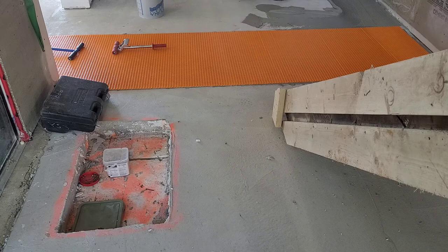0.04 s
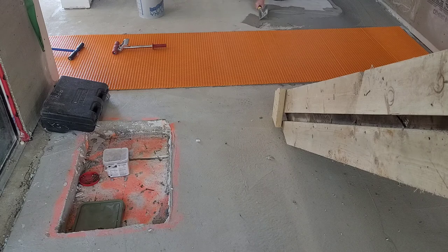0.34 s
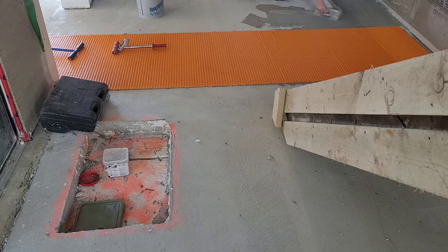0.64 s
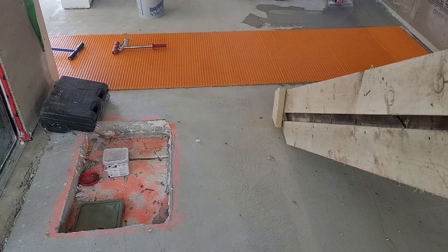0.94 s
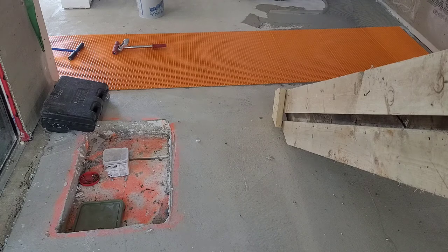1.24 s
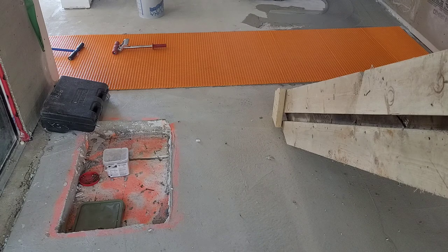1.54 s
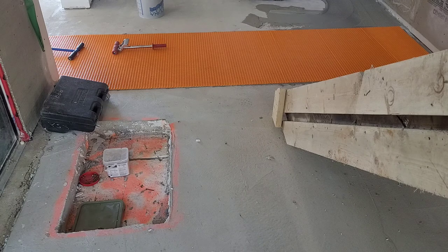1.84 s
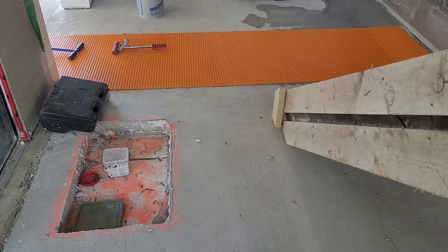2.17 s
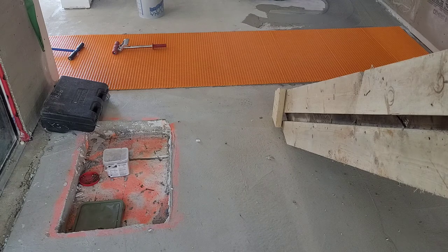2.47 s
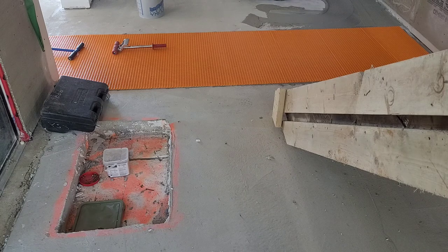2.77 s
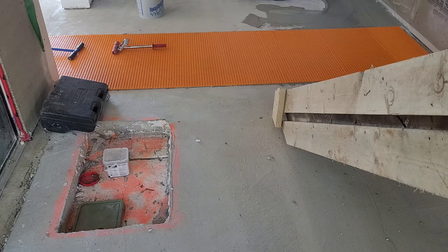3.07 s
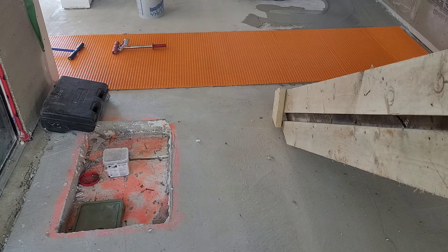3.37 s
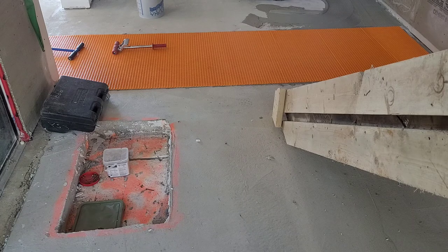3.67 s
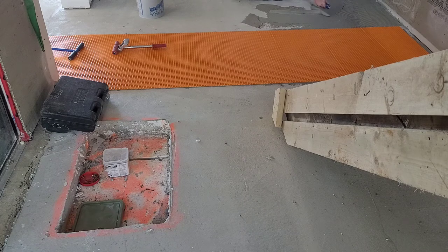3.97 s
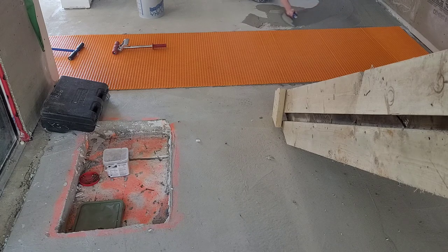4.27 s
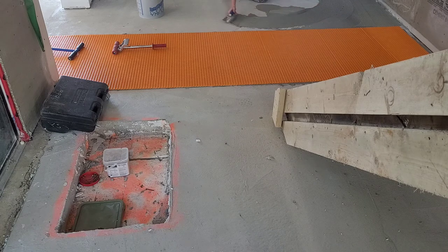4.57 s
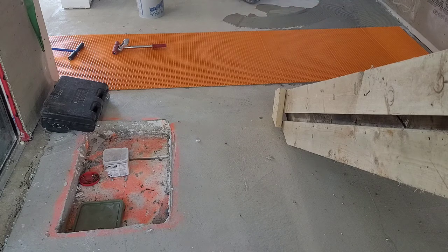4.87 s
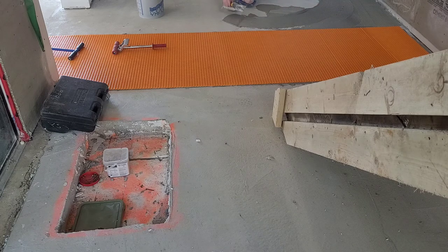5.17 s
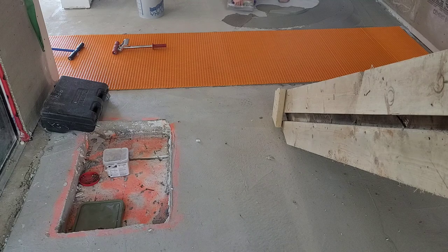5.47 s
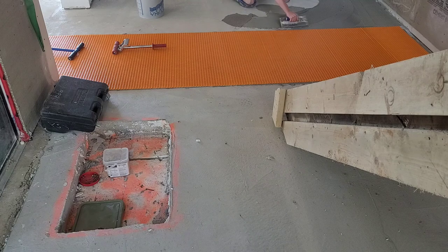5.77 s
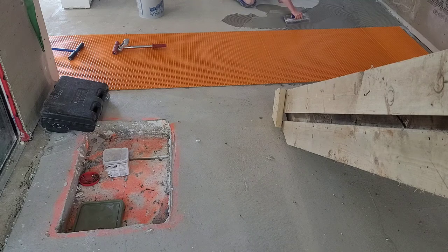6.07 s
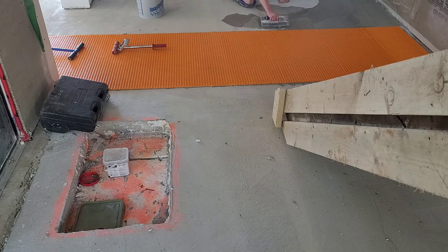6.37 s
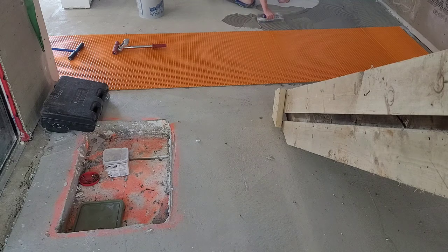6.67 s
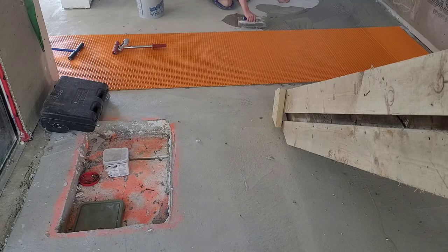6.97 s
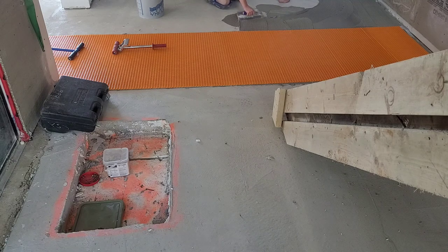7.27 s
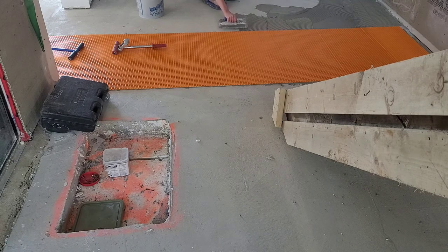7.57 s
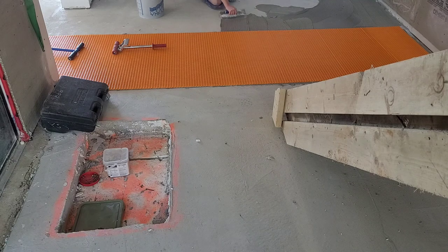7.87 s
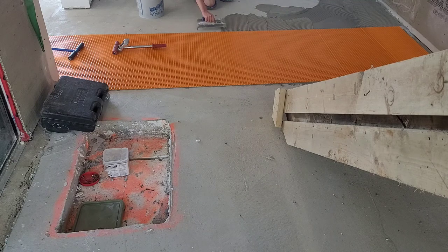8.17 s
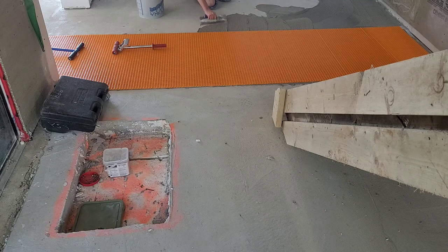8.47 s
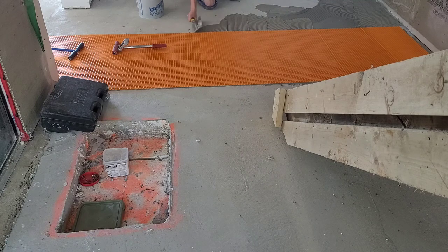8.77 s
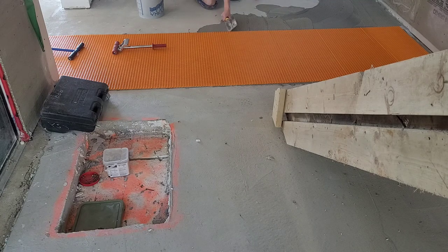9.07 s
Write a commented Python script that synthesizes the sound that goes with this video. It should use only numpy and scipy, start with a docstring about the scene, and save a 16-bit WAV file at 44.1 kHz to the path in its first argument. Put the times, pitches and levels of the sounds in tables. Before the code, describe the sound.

A steel trowel scrapes gritty mortar over concrete in a bare room. Long sweeps run from about 0.5 to 1.9 seconds, with a small squeak early on, followed by faint rubbing and a brief stroke at 3 seconds. Another long sweep from 3.6 seconds ends in a sharp tick and short blade ring near 4.9. From 5.4 seconds the strokes are short and quick, with grains ticking under the edge, a sharp catch near 8.7 and a longer last scrape around 9.

Dull thuds on timber come singly, strongest at 0.2 and 3.5 seconds, then in a footstep-like run on the left from 6.9 to 9, a few with scuffs. A low drone wavers and groans beside a faint whine, swelling around 1.4 and 4.5 seconds and mostly fading by 6. The left side sounds muffled, so the scraping is brighter on the right.

```python
"""A gritty scrape: a steel trowel spreads mortar over concrete in a bare room, in long sweeps, then short
quick strokes. Friction crushes sand under the blade, whose modes ring faintly; the edge ticks and squeaks.
Dull impacts on timber come singly, then in a run like footsteps, a few of them with a scuff.
A low drone wavers and groans, chiefly in the first half, beside a faint whine.
The left microphone port is muffled."""
import sys
import numpy as np
from scipy import signal
from scipy.fft import rfft, irfft, next_fast_len
from scipy.io import wavfile

SR = 44100
rng = np.random.default_rng(int(sys.argv[2]) if len(sys.argv) > 2 else 0)


def output_pcm(signal):
    """Save a mono or channel-first signal as 16-bit PCM at the path in sys.argv[1].

    Samples are clipped to [-1, 1] before scaling.
    """
    pcm = np.clip(np.atleast_2d(signal).T, -1, 1) * 32767
    wavfile.write(sys.argv[1], SR, np.round(pcm).astype(np.int16))


N = 411012

# Trowel strokes. Each row: start, attack and hold in seconds, grinding level at mid-hold in dB,
# swell over the hold in dB, edge rasp and fine-sand hiss in dB relative to the grinding.
STROKES = [(-0.033, 0.021, 0.5, -52, -5, 2, -7.5), (0.481, 0.11, 0.28, -25, -2.5, 0.5, -10.0),
           (0.888, 0.053, 0.22, -39.0, 4.5, -3.0, -4.0), (1.057, 0.14, 0.43, -32, 0.0, -7.5, -8.5),
           (1.602, 0.196, 0.062, -35.5, 1.5, -2.5, -8), (1.881, 0.119, 1.52, -52.5, -2, 3.5, -2.5),
           (2.847, 0.082, 0.059, -37, -6.0, -7.5, -11), (2.974, 0.089, 0.014, -27.0, -6, -3, -9.0),
           (3.579, 0.11, 0.058, -36.0, 2.5, -7, -10.0), (3.778, 0.11, 0.56, -31, -4, -6.5, -10),
           (4.376, 0.11, 0.18, -26.5, 3.5, -5, -9.5), (4.814, 0.026, 0.0064, -22, 3.5, 2, -8),
           (4.961, 0.023, 0.024, -54.5, -1, -1, -2.0), (5.129, 0.052, 0.016, -58.0, 2.5, -1.5, -5.0),
           (5.304, 0.034, 0.12, -53.5, 1, -2, -4.5), (5.439, 0.013, 0.005, -30.0, -1, -5, -17),
           (5.476, 0.014, 0.089, -32.0, -3, -4.5, -9.5), (5.537, 0.067, 0.014, -24.5, 2.5, -4.0, -9.5),
           (6.087, 0.028, 0.006, -51.5, -11, -8, -7), (6.195, 0.017, 0.013, -46.5, -3, -5, -4.5),
           (6.235, 0.03, 0.037, -32, 0.5, -5, -6.5), (6.326, 0.045, 0.044, -42, -4, -3, -9),
           (6.584, 0.036, 0.029, -47.0, -7, -1.5, -6.5), (6.67, 0.013, 0.11, -67.5, -11, 3, 1),
           (6.789, 0.039, 0.051, -29.5, 8.5, -4, -7.5), (6.932, 0.034, 0.055, -42.0, -4.5, -0.5, -7.5),
           (7.121, 0.033, 0.15, -54, -5, -0.5, -4), (7.255, 0.013, 0.018, -57.5, 1, -3.0, 1),
           (7.34, 0.059, 0.033, -31, -1.5, -6.5, -5), (7.43, 0.02, 0.066, -38, -1.5, -3.5, -8.5),
           (7.68, 0.046, 0.11, -51, -5.5, -4.5, -8.5), (7.836, 0.031, 0.068, -51.5, 7.0, -4, -7),
           (7.935, 0.043, 0.12, -25.5, 1.5, -4, -8.0), (8.31, 0.033, 0.18, -61.0, -2, -7, -3),
           (8.474, 0.044, 0.12, -46.5, 6, -6, -8), (8.584, 0.044, 0.024, -44.5, 1.0, 0, -13.0),
           (8.645, 0.026, 0.005, -19.5, 2.5, -4.5, -9.5), (8.815, 0.029, 0.097, -47.5, 0.0, -3.5, -5.5),
           (8.877, 0.11, 0.3, -26, 0, -7, -14)]
# Decay of drag, grinding, rasp and hiss, in that order, once the blade lifts.
# Each row: fall in dB per second, level of the lingering tail in dB, its fall in dB per second.
STROKE_RELEASE = [(232, -13.5, 90), (242, -13, 84.5), (303, -16.5, 84.5), (363, -23, 83.5)]
# Spectrum of steel on sand. Each row: frequency in Hz, spectral level in dB.
SCRAPE_SPECTRUM = [(150, -6.5), (330, -6), (480, -13.5), (620, -2), (1300, -0.5), (2100, -4.5),
                   (3200, -14.5), (4200, -18), (5250, -19.5), (5900, -26.5), (8000, -19), (9900, -23),
                   (11600, -16), (13800, -22.5)]
# Blade resonances. Each row: frequency in Hz, bandwidth in Hz, gain in dB relative to the scrape.
BLADE_MODES = [(435, 37, 4.5), (580, 12, -22), (759, 31, -5), (1080, 140, -12), (2316, 88, -39),
               (2730, 95, -15), (4770, 500, -1.5), (11140, 500, -12)]
# Coarse grains caught by the edge. Each row: start in seconds, level of the excitation in dB.
GRAIN_CATCHES = [(.585, -17), (2.929, -23), (3.655, -26), (4.835, -19), (4.85, -14), (5.449, -24),
                 (5.627, -18), (6.108, -45), (6.211, -48), (7.528, -38), (7.718, -34), (7.959, -23),
                 (8.019, -32), (8.109, -27), (8.664, -19), (8.697, -10), (9.234, -16)]
# Brief tones: two faint notes of the thin whine, then squeaks of the edge and, at 4.868 s, a short
# ring as the blade strikes. Each row: centre and length in seconds, pitch in Hz, level in dB.
BRIEF_TONES = [(0.392, .05, 987, -45), (.457, .035, 985, -48), (0.72, 0.06, 1100, -24),
               (0.743, 0.056, 11600, -33), (4.868, 0.045, 585, -25), (5.633, 0.03, 743, -31),
               (8.633, 0.039, 1358, -32.5), (8.7, 0.019, 459, -26.5)]
# Blows on timber. Each row: start in seconds, level in dB, nominal pitch in Hz,
# boom of the boards in dB relative to the blow, left minus right in dB.
THUDS = [(0.218, -19.5, 187, -23, 0.5), (0.263, -32, 110, -15, -1), (1.277, -32, 155, -8, -2),
         (1.3, -37, 100, -12, 0), (2.05, -40, 208, -28, -5), (2.487, -33, 182, -20, -0.5),
         (2.5, -39, 100, -15, 0), (3.45, -16, 147, -18, -1), (3.491, -29.5, 242, -17, -3),
         (4.081, -49, 110, -4, 0), (5.46, -51, 110, 0.5, -7), (5.88, -45.5, 110, -1.5, -7),
         (6.904, -29.5, 147, -14, 11.5), (6.96, -38, 109, -4, 12), (7.51, -35.5, 198, -3.5, 15),
         (7.711, -27, 141, -17, 11.5), (7.735, -30, 239, -15, 9), (7.968, -35.5, 196, -0.5, 24),
         (8.206, -31, 185.7, -2, 20), (8.459, -31.5, 180, 1, 26.5), (8.497, -31.5, 215, -15, 3.5),
         (8.705, -29.5, 187, -1, 16.5), (8.85, -35.5, 145, 1.5, 14.5), (8.955, -28, 193, -2.5, 24)]
# Timber resonances. Each row: nominal frequency in Hz, relative level in dB, 60 dB decay time in seconds.
TIMBER_MODES = [(99, -12, 0.25), (138, -5.5, 0.074), (202, 1, 0.13), (273, -0.5, 0.14), (346, -9.5, 0.014),
                (434, -10.5, 0.043), (644, -10, .1), (800, -10, .12)]
# Scuffs that accompany some thuds. Each row: start in seconds, level in dB.
SCUFFS = [(3.44, -55), (7.702, -41.5), (8.2, -33), (8.463, -33.5)]
# Spectrum of a scuff. Each row: frequency in Hz, spectral level in dB.
SCUFF_SPECTRUM = [(200, 3), (430, -11.5), (560, -2), (760, 6.5), (1300, -3), (2200, -14), (3500, -31),
                  (7000, -44), (15000, -60)]
# Envelope of the drone. Each row: time in seconds, level in dB.
DRONE_LEVEL = [(0, -49.5), (.7, -45), (1.05, -44), (1.25, -38), (1.6, -38), (1.95, -48), (2.25, -52),
               (2.6, -46), (3.3, -51), (3.7, -43), (4.45, -37.5), (4.8, -46), (5.15, -61.5), (5.5, -47),
               (5.9, -62), (6.55, -76.5), (9.3, -67)]
# Spectrum of the rumble under the drone. Each row: frequency in Hz, spectral level in dB.
RUMBLE_SPECTRUM = [(25, -13), (60, -5), (100, -7.5), (150, 4), (260, -1.5), (500, -36), (2000, -83.5)]
# Low groans. Each row: centre and length in seconds, level in dB, pitch in Hz.
GROANS = [(0.067, 0.038, -41.5, 235), (0.458, .07, -44.5, 275), (0.63, 0.054, -36.5, 234),
          (0.904, 0.061, -36, 257), (1.21, 0.12, -34, 258), (2.09, .09, -41, 228), (2.41, 0.034, -41, 240),
          (2.468, .035, -35, 262), (2.762, 0.07, -45, 222), (2.942, 0.051, -28.5, 270),
          (3.414, 0.067, -38.5, 224.6), (3.702, 0.048, -35.5, 262), (4.042, 0.041, -25.5, 274),
          (4.302, 0.037, -32.5, 250), (4.394, 0.07, -33, 262.2), (4.529, 0.1, -26.5, 270),
          (5.367, .06, -48, 247), (5.51, 0.04, -39.5, 242), (6.29, .07, -39, 293.7),
          (7.388, 0.044, -41, 303), (9.303, .08, -31, 280)]
# Envelope of the whine. Each row: time in seconds, level in dB.
WHINE_LEVEL = [(0, -59), (2.4, -60), (5.0, -75), (6.3, -69), (9.3, -70)]
# Spectrum of the still room. Each row: frequency in Hz, spectral level in dB.
AIR_SPECTRUM = [(25, -12), (60, -2.5), (140, -0.5), (280, 2), (420, -22), (750, -13), (1500, -15),
                (3500, -44), (8000, -38), (15000, -52)]
# Reverberation of the room. Each row: frequency in Hz, 60 dB decay time in seconds.
ROOM_T60 = [(80, 0.44), (300, 0.22), (800, 0.22), (2000, 0.23), (5500, 0.21), (14000, 0.022)]
# Response of the muffled left port. Each row: frequency in Hz, gain in dB.
LEFT_PORT_GAIN = [(60, 0.5), (280, 0), (430, 4.5), (620, -3), (900, -3.5), (1400, -12), (2200, -12),
                  (3300, -16.5), (5000, -25.5), (8200, -43), (10000, -40), (15000, -26)]

CUTOFF_HZ = 15900
CONTROL_STEP = 40   # samples between the points of a slow curve


def trowel(judder_db=1.7, judder_hz=90, swell_db=1.2, hard_hiss_db=-33):
    """Friction noise: sand excites the blade band by band, modulated by uneven sticking and slipping."""
    drag_db, grind_db, rasp_db, hiss_db = stroke_levels()
    slips = unit_rms(from_db(judder_db * drift(judder_hz) + swell_db * drift(8.7)))
    fine_sand = sand(per_s=18000, spread_db=4.5)
    # Light rubbing is dull: the top sizzles and the steel sings only as the blade bites.
    sizzle_db = hiss_db - 6 + 0.64 * np.clip(hiss_db + 54, -22, 5)
    steel_db = hiss_db - 5 + 0.72 * np.minimum(hiss_db - hard_hiss_db, 0)
    drag = friction_band(sand(per_s=2500, spread_db=0.5), slips, 108, 560, drag_db)
    grind = friction_band(sand(per_s=4000, spread_db=3.5), slips, 560, 1550, grind_db)
    rasp = friction_band(sand(per_s=7000, spread_db=2.5), slips, 1550, 3800, rasp_db)
    hiss = friction_band(fine_sand, slips, 3800, 9300, hiss_db)
    sizzle = friction_band(fine_sand[::-1], slips, 9300, CUTOFF_HZ, sizzle_db)
    steel = friction_band(fine_sand[::-1], slips, 4600, 5400, steel_db)
    return filtered(drag + grind + rasp + hiss + sizzle + steel, blade_response)


def stroke_levels(attack_exponent=1.52, usual_grind_db=-30):
    """Friction follows load: drag, grinding, rasp and hiss, in dB, rise, hold and decay each stroke."""
    t = np.arange(0, N, CONTROL_STEP) / SR
    power = np.zeros((len(STROKE_RELEASE), len(t)))
    for start, attack, hold, db, swell_db, rasp_db, hiss_db in STROKES:
        onset = np.clip((t - start) / attack, 0, 1) ** attack_exponent
        progress = np.clip((t - start - attack) / hold, 0, 1)
        load = onset * from_db(db + swell_db * (progress - 0.5))
        lifted_s = np.maximum(t - start - attack - hold, 0)
        # The mortar's drag loses ground as the blade presses harder or tilts on its rasping edge.
        drag_db = -15.5 - 0.33 * (db - usual_grind_db) - 0.48 * rasp_db
        for band, band_db in enumerate((drag_db, 0, rasp_db, hiss_db)):
            fall, tail_db, tail_fall = STROKE_RELEASE[band]
            tail = (lifted_s > 0) * from_db(tail_db - tail_fall * lifted_s)
            power[band] += (load * from_db(band_db)) ** 2 * (from_db(-fall * lifted_s) ** 2 + tail ** 2)
    levels_db = 10 * np.log10(power + 1e-12)
    return sampled_curves(np.column_stack([t, *levels_db]))


def sand(per_s, spread_db):
    """Shot noise: grains of uneven size are crushed at random; echoes scramble them for each port."""
    grains = np.zeros((2, N))
    crushed = rng.random((2, N)) < per_s / SR
    size_db = spread_db * np.minimum(rng.exponential(1, crushed.sum()), 4)
    grains[crushed] = from_db(size_db) * rng.choice([-1, 1], crushed.sum())
    return unit_rms(grains)


def friction_band(grains, slips, low_hz, high_hz, level_db, diffuse_share=0.44, wander_db=0.32):
    """Direct and diffuse fields: one band of grain impacts, plus the even wash of their reverberation."""
    def band(hz):
        below_low, below_high = (1 / (1 + (hz / corner) ** 14) for corner in (low_hz, high_hz))
        return np.sqrt((1 - below_low) * below_high)

    hz = np.arange(SR // 2)
    band_rms = np.sqrt(np.mean(np.abs(band(hz) * blade_response(hz)) ** 2))
    strength = from_db(level_db + wander_db * drift(3.6)) * slips / band_rms
    t60 = value_at(ROOM_T60, np.sqrt(low_hz * high_hz))
    retained = from_db(-60 / (t60 * SR)) ** 2   # share of energy left after one sample
    room_power = signal.lfilter([1 - retained], [1, -retained], strength ** 2)
    wash = np.sqrt(diffuse_share * room_power) * rng.standard_normal((2, N))
    direct = np.sqrt(1 - diffuse_share) * strength * grains
    return filtered(direct + wash, band)


def blade_response(hz):
    """Resonance: the blade's modes stand out of the broad spectrum of steel on sand."""
    modes = sum(from_db(db) / (1 + 2j * (hz - centre) / width) for centre, width, db in BLADE_MODES)
    bass_cut = hz ** 2 / (hz ** 2 + 110 ** 2)
    return from_db(value_at(SCRAPE_SPECTRUM, hz)) * (1 + modes) * bass_cut


def grain_catches(crunch_s=0.0054):
    """Impulsive excitation: a coarse grain bursts under the edge and ticks the blade."""
    bursts, t = np.zeros(N), np.arange(SR // 20) / SR
    for start, db in GRAIN_CATCHES:
        mix_in(bursts, start, from_db(db) * rng.standard_normal(len(t)) * np.exp(-t / crunch_s))
    return filtered(bursts, blade_response)


def brief_tones(waver=0.027):
    """Frequency-modulated tone bursts: notes of the whine, edge squeaks and the struck blade's ring."""
    out = np.zeros(N)
    for centre, length, hz, db in BRIEF_TONES:
        out += from_db(db) * gaussian(centre, length) * sine(hz * (1 + waver * drift(151)))
    return out


def thuds(rise_s=0.0094, boom_hz=59, boom_rise_s=0.022, sag=0.069, knock_db=-17):
    """Soft impact on timber: a few cycles sag in pitch while the boards boom and rattle."""
    out, t = np.zeros((2, N)), np.arange(SR // 2) / SR
    glide = 1 + sag * (np.exp(1 - t / rise_s) - 1)
    knock_band = signal.butter(2, [280, 750], "band", fs=SR, output="sos")
    for start, db, hz, boom_db, left_db in THUDS:
        boom_tone = np.sin(2 * np.pi * boom_hz * rng.uniform(0.85, 1.314) * t)
        boom = from_db(boom_db) * pulse(t, boom_rise_s) * boom_tone
        rattle = from_db(-8 + 0.49 * left_db) * board_rattle(t)   # stronger towards the left
        knock = from_db(knock_db) * unit_rms(signal.sosfilt(knock_band, rng.standard_normal(len(t))))
        blow = pulse(t, rise_s) * (sine(hz * glide) + knock)
        thud = from_db(db) * (blow + boom + rattle)
        left_share = 1 / (1 + from_db(-left_db))
        mix_in(out[0], start, 2 * left_share * thud)
        mix_in(out[1], start, 2 * (1 - left_share) * thud)
    return out


def board_rattle(t, rise_s=0.028):
    """Modal vibration: a flurry of contacts drives each mode of the timber as a damped oscillator."""
    contacts = rng.standard_normal((len(TIMBER_MODES), len(t))) * pulse(t, rise_s)
    rattle = np.zeros(len(t))
    for force, (hz, db, t60) in zip(contacts, TIMBER_MODES):
        radius = from_db(-60 / (t60 * SR))
        angle = 2 * np.pi * hz * rng.uniform(0.93, 1.052) / SR
        mode = signal.lfilter([0, np.sin(angle)], [1, -2 * radius * np.cos(angle), radius ** 2], force)
        rattle += from_db(db) * mode / np.abs(mode).max()
    return rattle / np.sqrt(2)


def scuffs(rise_s=0.029, hold_s=0.037, fall_db_per_s=170, left_db=-1):
    """Sliding friction: a short dull rub of noise, as of a sole on a dusty floor."""
    envelope, t = np.zeros(N), np.arange(N) / SR
    for start, db in SCUFFS:
        released_s = np.maximum(t - start - rise_s - hold_s, 0)
        envelope += np.clip((t - start) / rise_s, 0, 1) * from_db(db - fall_db_per_s * released_s)
    return envelope * noise(SCUFF_SPECTRUM, (2, N)) * from_db([[left_db], [0]])


def drone(base_hz=254, hz_per_db=1.6, hz_per_s=2.7, flutter_db=4.2, surge_db=1.8, rumble_db=-9.5):
    """Random modulation: a low tone wavers over a rumble, its pitch rising with level and with time."""
    level_db, = sampled_curves(DRONE_LEVEL)
    hz = base_hz + hz_per_db * (level_db + 40) + hz_per_s * np.arange(N) / SR
    tone = sine(hz * (1 + 0.11 * drift(36) + 0.04 * drift(5)))
    flutter = from_db(flutter_db * drift(36) + surge_db * drift(7))
    rumble = from_db(rumble_db) * noise(RUMBLE_SPECTRUM, N)
    return from_db(level_db) * (unit_rms(flutter * tone) + rumble)


def groans(waver=0.06):
    """Shallower frequency modulation: brief swells near the drone's pitch hold their note better."""
    out = np.zeros(N)
    pitch_ratio = 1 + waver * drift(36)
    for centre, length, db, hz in GROANS:
        out += from_db(db) * gaussian(centre, length) * np.sqrt(2) * sine(hz * pitch_ratio)
    return out


def whine(hz=980, waver=0.012, flutter_db=3.5):
    """Amplitude and frequency modulation: a thin, unsteady tone comes and goes."""
    level_db, = sampled_curves(WHINE_LEVEL)
    tone = sine(hz * (1 + waver * drift(25)))
    return from_db(level_db) * unit_rms(from_db(flutter_db * drift(18)) * tone)


def room_air(level_db=-57):
    """Ambient noise: the steady hush of the still room, uncorrelated between the ports."""
    return from_db(level_db) * noise(AIR_SPECTRUM, (2, N))


def reverberate(x, wet, early, early_s):
    """Reverberation: `wet` of the energy decays by band; `early` of the rest is near reflections."""
    t, edges = np.arange(SR * 3 // 5) / SR, np.geomspace(30, 18000, 10)
    near = np.exp(-t / early_s)
    response = np.zeros((2, len(t)))
    for low, high in zip(edges, edges[1:]):
        tail = from_db(-60 * t / value_at(ROOM_T60, np.sqrt(low * high))) * (1 - near)
        power = wet * tail ** 2 / np.sum(tail ** 2) + (1 - wet) * early * near ** 2 / np.sum(near ** 2)
        band = signal.butter(3, [low, high], "band", fs=SR, output="sos")
        response += signal.sosfilt(band, np.sqrt(power) * rng.standard_normal(response.shape))
    response[:, 0] += np.sqrt((1 - wet) * (1 - early))   # direct sound
    return signal.oaconvolve(np.atleast_2d(x), response, axes=1)[:, :N]


def from_db(db):
    """Amplitude ratio of a level in decibels."""
    return 10 ** (np.asarray(db) / 20)


def unit_rms(x):
    """Normalisation to a mean square of one."""
    return x / np.sqrt(np.mean(x ** 2) + 1e-20)


def sine(hz):
    """Oscillation whose phase is the integral of its instantaneous frequency."""
    return np.sin(2 * np.pi * np.cumsum(hz) / SR)


def gaussian(centre_s, length_s):
    """Gaussian envelope, length_s wide at 1/e of its peak."""
    return np.exp(-(2 * (np.arange(N) / SR - centre_s) / length_s) ** 2)


def pulse(t, peak_s):
    """Envelope that swells to one at peak_s and dies away."""
    return (t / peak_s * np.exp(1 - t / peak_s)) ** 2


def drift(corner_hz):
    """Random fluctuation of unit spread: noise through a two-pole low-pass."""
    pole, settling = np.exp(-2 * np.pi * corner_hz * CONTROL_STEP / SR), 2000
    white = rng.standard_normal(N // CONTROL_STEP + settling + 2)
    slow = signal.lfilter([1], [1, -2 * pole, pole ** 2], white)[settling:]
    return np.interp(np.arange(N) / CONTROL_STEP, np.arange(len(slow)), unit_rms(slow))


def sampled_curves(rows):
    """Linear interpolation of (time, values...) rows at every sample."""
    times, *columns = np.transpose(rows)
    return [np.interp(np.arange(N) / SR, times, column) for column in columns]


def value_at(table, hz):
    """Interpolation on a logarithmic frequency axis."""
    frequencies, values = np.transpose(table)
    return np.interp(np.log(hz + 1e-9), np.log(frequencies), values)


def filtered(x, response):
    """Linear filtering: the spectrum is multiplied by response(hz)."""
    size = next_fast_len(N + SR // 4)
    return irfft(rfft(x, size) * response(np.fft.rfftfreq(size, 1 / SR)), size)[..., :N]


def coloured(x, spectrum):
    """Spectral shaping by a table of frequency in Hz and gain in dB."""
    return filtered(x, lambda hz: from_db(value_at(spectrum, hz)))


def noise(spectrum, shape):
    """Coloured Gaussian noise of unit power."""
    return unit_rms(coloured(rng.standard_normal(shape), spectrum))


def mix_in(out, start_s, sound):
    """Superposition of a sound from start_s onward."""
    i = round(start_s * SR)
    out[i:i + len(sound)] += sound[:N - i]


def scene(bass_lag_s=0.00075):
    """Superposition in one room; a time difference puts the low sounds out of step at the two ports."""
    scrape = reverberate(trowel(), wet=0.09, early=0.06, early_s=0.004)
    ticks = reverberate(grain_catches() + brief_tones(), wet=0.19, early=0.47, early_s=0.007)
    lows = reverberate(thuds() + drone() + groans() + whine(), wet=0.13, early=0.08, early_s=0.007)
    lows = filtered(lows, lambda hz: np.exp(1j * np.pi * hz * bass_lag_s * np.array([[1], [-1]])))
    return scrape + ticks + lows + room_air() + scuffs()


def record(dry, hiss_db=-84.5):
    """Attenuation and self-noise: the left port loses treble; both hiss faintly and are band-limited."""
    ports = np.array([coloured(dry[0], LEFT_PORT_GAIN), dry[1]])
    hiss = from_db(hiss_db) * rng.standard_normal((2, N))
    return filtered(ports + hiss, lambda hz: np.clip((CUTOFF_HZ - hz) / 150 + 0.5, 0, 1))


dry = scene()
out = record(dry)
output_pcm(out)
```